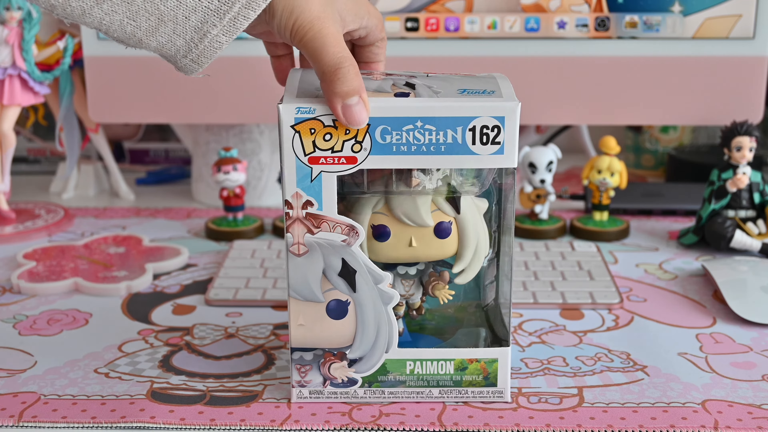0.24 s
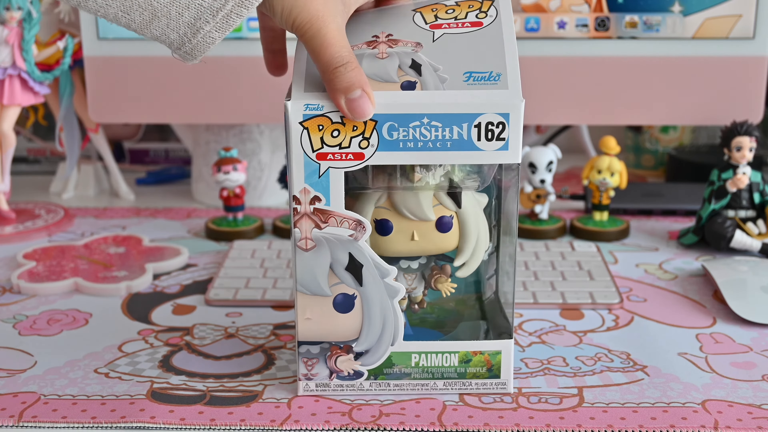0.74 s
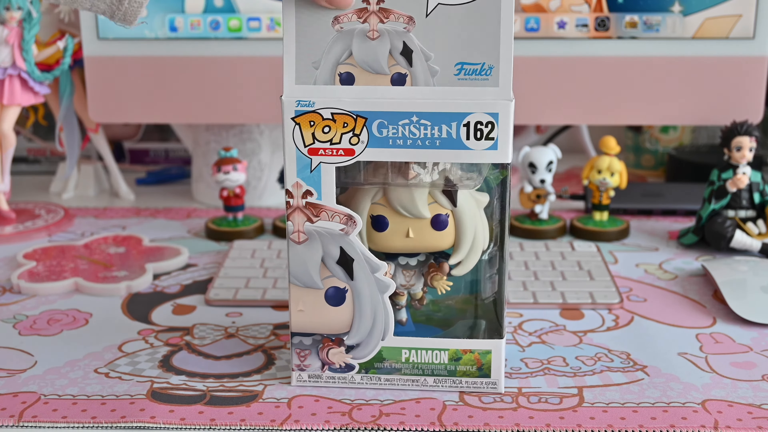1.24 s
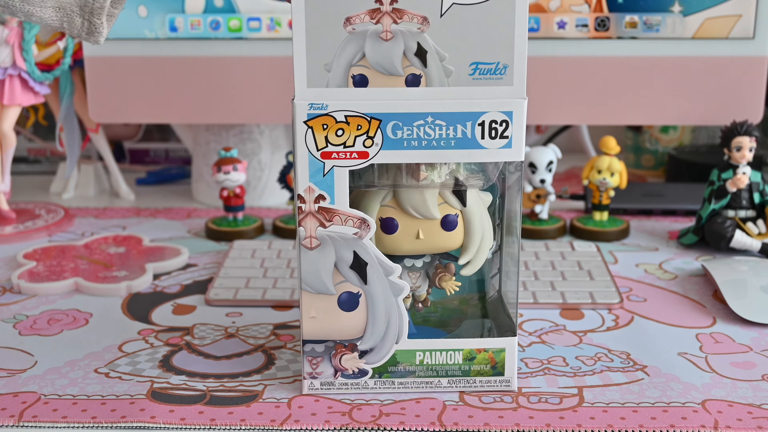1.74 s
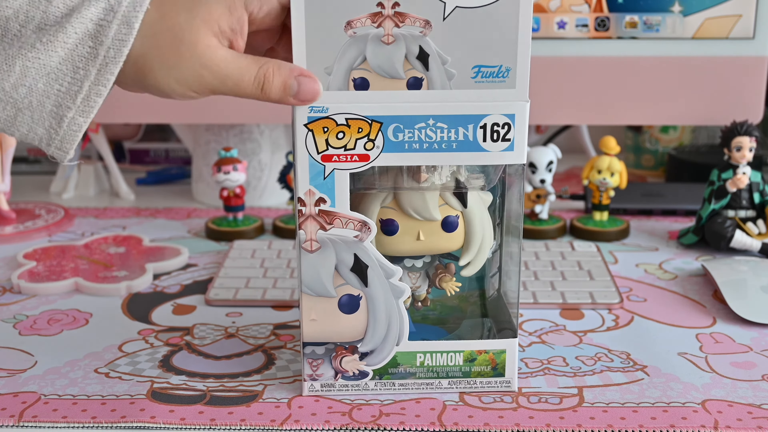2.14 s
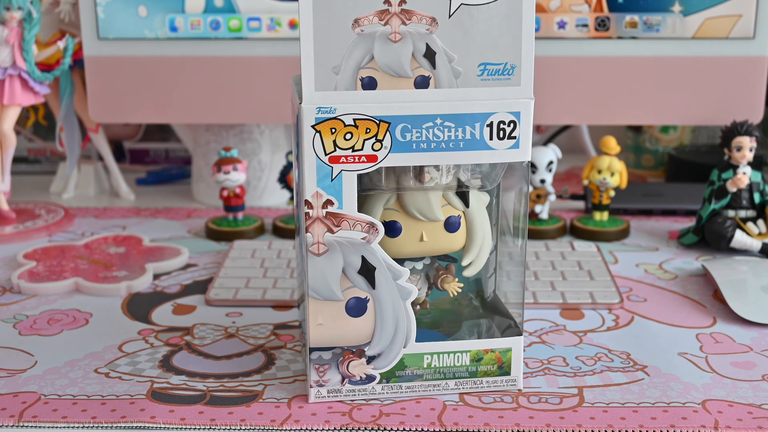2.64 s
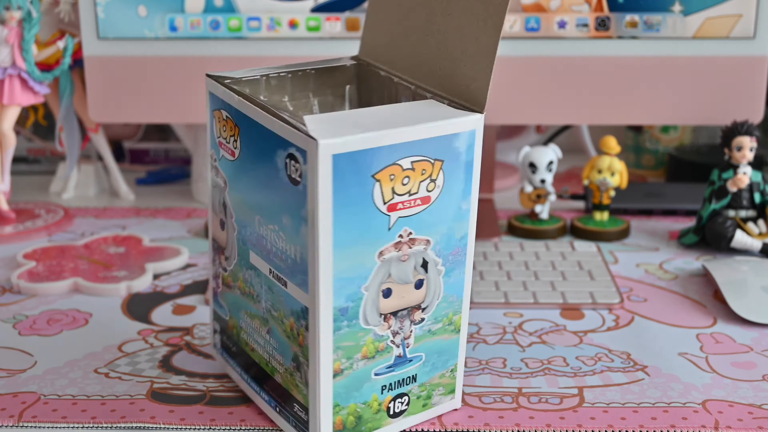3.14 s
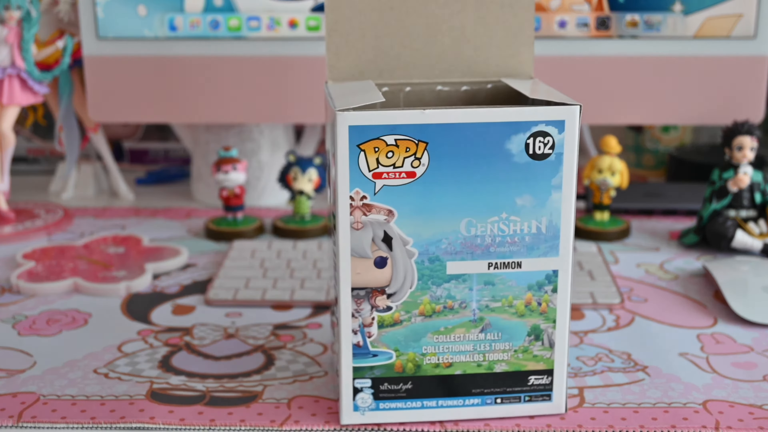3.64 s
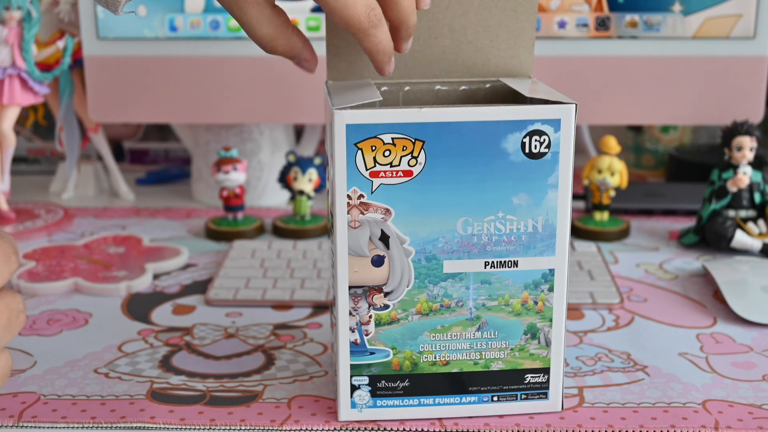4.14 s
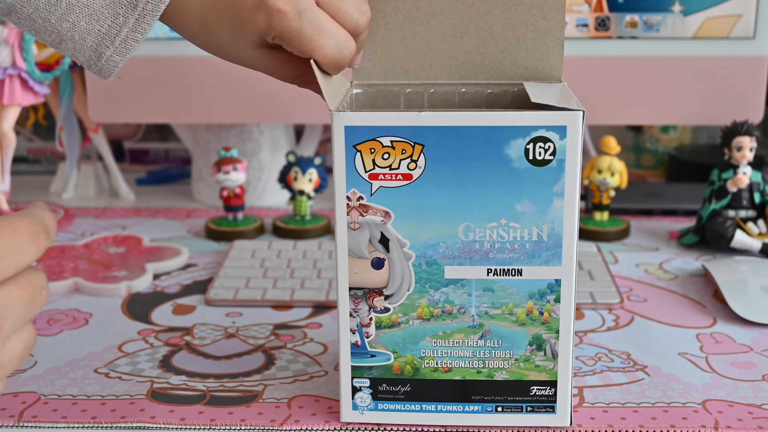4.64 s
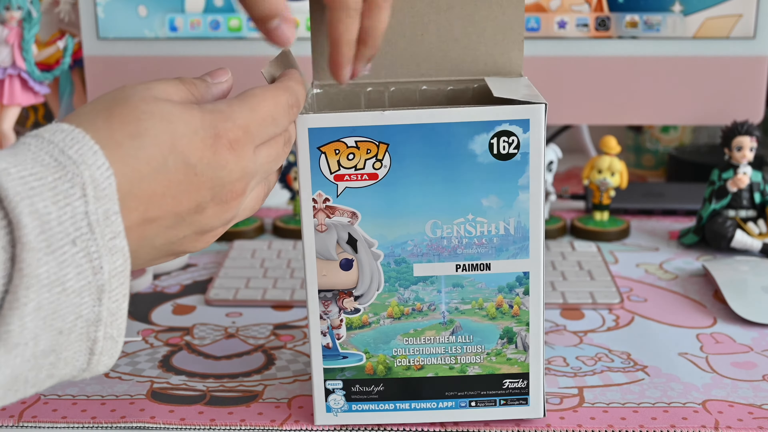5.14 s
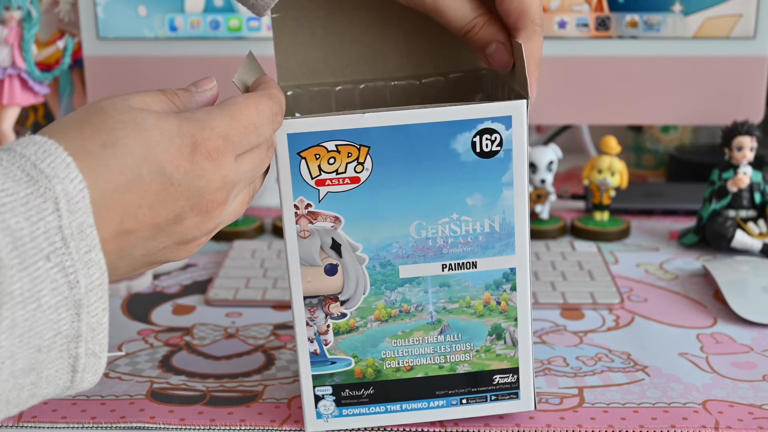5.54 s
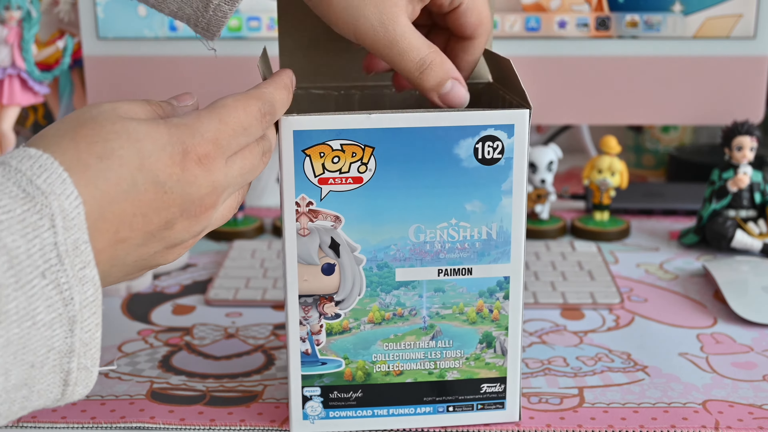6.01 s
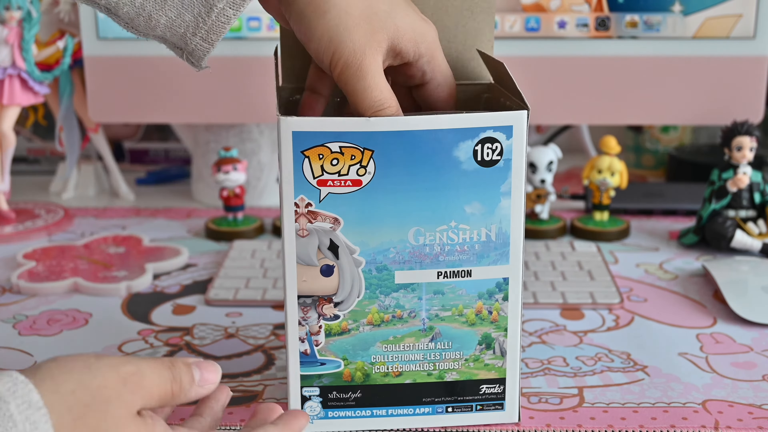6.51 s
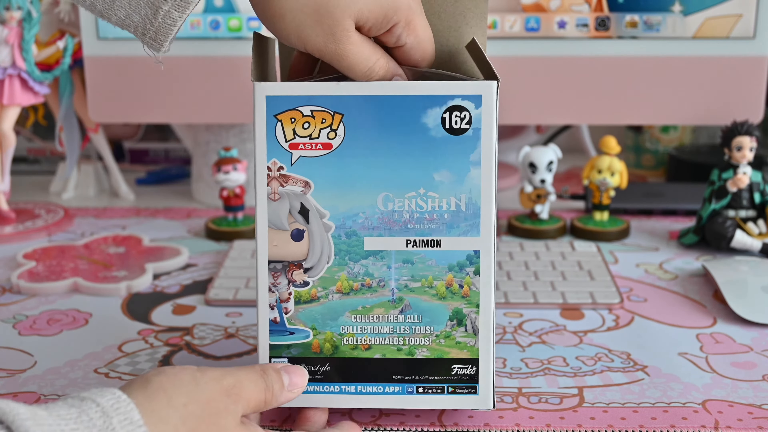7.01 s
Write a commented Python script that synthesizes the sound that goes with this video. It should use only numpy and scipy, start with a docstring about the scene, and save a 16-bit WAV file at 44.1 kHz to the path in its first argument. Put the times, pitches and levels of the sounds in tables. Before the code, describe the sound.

Close hollow taps and a lid pop, quiet card rubbing and flap clicks, then bright plastic crackling and one sharp snap in a small quiet room.

```python
"""On a desk in a small quiet room, a small cardboard box is opened close to the microphone: the lid is pulled free,
the box is turned, its side flaps are bent out, and fingers grip the thin plastic insert, which snaps loose and slides up.
Rubs, wipes, scrapes and squeaks are stick-slip friction; taps, creaks and crackles are impacts ringing damped modes.
The box resonates to all handling; the snap and the sliding insert radiate directly. The room adds diffuse reflections,
over steady air noise."""
import sys
import numpy as np
from scipy import signal
from scipy.fft import rfft, irfft, next_fast_len
from scipy.io import wavfile
from scipy.ndimage import uniform_filter1d, map_coordinates

SR = 44100
rng = np.random.default_rng(int(sys.argv[2]) if len(sys.argv) > 2 else 0)


def inscribe(sig):
    """Save sig as 16-bit PCM at rate SR to the path in sys.argv[1].

    A 1-D sig is mono; a 2-D sig holds one channel per row.
    Samples are clipped to [-1, 1] before scaling.
    """
    pcm = np.round(np.clip(np.atleast_2d(sig).T, -1, 1) * 32767)
    wavfile.write(sys.argv[1], SR, pcm.astype(np.int16))


N = 320607  # length in samples

# Levels in the tables are relative source levels; the trims in each function and the box response act on them.
# Spectra give relative density: their overall level is normalized away.


def amp(db):
    """Logarithmic level: decibels become an amplitude gain."""
    return 10 ** (np.asarray(db) / 20)


def unit(x):
    """Normalization: the signal is scaled to rms 1."""
    return x / np.sqrt(np.mean(x ** 2) + 1e-20)


def along(points, hz):
    """Interpolation on a logarithmic frequency axis, from rows of (Hz, value)."""
    f, v = np.transpose(points)
    return np.interp(np.log(hz + 1), np.log(f + 1), v)


def filtered(x, response):
    """Linear filtering: the spectrum is multiplied by a complex response of frequency."""
    m = next_fast_len(N + SR // 2)
    return irfft(rfft(x, m) * response(np.fft.rfftfreq(m, 1 / SR)), m)[:N]


def colour(x, spectrum, size=2048):
    """Minimum-phase filtering: the folded cepstrum gives a causal pulse that keeps the power of white noise."""
    cepstrum = irfft(np.log(amp(along(spectrum, np.fft.rfftfreq(size, 1 / SR)))))
    cepstrum[1:size // 2] *= 2
    cepstrum[size // 2 + 1:] = 0
    pulse = irfft(np.exp(rfft(cepstrum)))
    return signal.fftconvolve(x, pulse / np.linalg.norm(pulse))[:len(x)]


def resonance(f, hz, width):
    """Damped oscillator: causal response of one mode, 1 at its centre."""
    return 1j * f * width / (hz * hz - f * f + 1j * f * width)


def wobble(rate):
    """Slow random modulation: a smooth curve through random knots, rate of them a second."""
    knots = rng.standard_normal(int(N * rate / SR) + 4)
    return map_coordinates(knots, [np.arange(N) * rate / SR])


def add(track, s, sound):
    """Superposition: a sound is mixed into the track at time s."""
    start = max(round(s * SR), 0)
    part = track[start:start + len(sound)]
    part += sound[:len(part)]


def slips(rate, spread_db, smooth):
    """Stick-slip friction of rms 1: sparse slips of uneven size over smooth sliding noise."""
    spread = amp(spread_db * np.clip(rng.standard_normal(N), -2, 2))
    sizes = spread * rng.choice([-1, 1], N)
    sparse = sizes * (rng.random(N) < rate / SR)
    return unit(unit(sparse) + smooth * rng.standard_normal(N))


def same_energy(ring):
    """Energy normalization: a transient gets the energy of 10 ms at rms 1."""
    return ring / np.sqrt(np.sum(ring ** 2) / (SR // 100))


def burst(spectrum, t60, attack, tint_db=0):
    """Impact: decaying coloured noise stands for a dense cluster of modes, tinted by where it lands."""
    t = np.arange(SR // 5) / SR
    fade = amp(-60 * t / t60) * (1 - np.exp(-t / attack))
    hz = np.geomspace(20, SR / 2, num=60)
    tint = tint_db * rng.standard_normal(len(hz))
    tinted = np.column_stack([hz, along(spectrum, hz) + tint])
    return same_energy(colour(rng.standard_normal(len(t)) * fade, tinted))


def strokes(rows, attack, release, rest_db):
    """Incoherent addition: each stroke rises, holds and dies away, and overlapping strokes add in power."""
    t = np.arange(N) / SR
    power = np.full(N, amp(rest_db) ** 2)
    for s, length, db in rows:
        rise = np.clip((t - s) / min(attack, length / 2), 0, 1)
        fall = np.exp(-np.maximum(t - s - length, 0) / release)
        power += (amp(db) * rise * fall) ** 2
    return np.sqrt(power)


# Spectrum of the air noise. Each row: frequency in Hz, density in dB per Hz.
AIR = [(15, -78), (25, -6.5), (91, -7), (246, 2), (1530, -8), (3720, -21.5), (6550, -19.5), (15500, -26)]
AIR_DB = -58.5  # rms level


def steady_air():
    """Stationary broadband noise: white noise is shaped by one fixed spectrum."""
    return amp(AIR_DB) * unit(colour(rng.standard_normal(N), AIR))


# Pushes that strain the panels as the lid is pulled free and folded back, the box is turned, the side flaps
# are bent out, and the insert is gripped and drawn up. Each row: start in seconds, length in seconds, level in dB.
PUSHES = [(0.296, 0.12, -42), (0.439, 0.17, -38.5), (0.65, 0.086, -40.5), (0.78, 0.032, -44.5),
          (1.251, 0.61, -53.5), (1.717, 0.033, -47.5), (2.136, 0.12, -55), (2.522, 0.03, -44.5),
          (2.556, 0.021, -38.5), (2.641, 0.49, -61.5), (3.329, 0.22, -57), (4.053, 0.56, -54),
          (4.555, 0.042, -34), (5.04, 0.12, -43), (5.437, 0.14, -44), (5.754, 0.049, -41.5),
          (6.039, 0.64, -49.5), (6.676, 0.066, -40.5), (6.893, 0.35, -45.5)]
# Spectra of the panels and the skin. Each row: frequency in Hz, density in dB per Hz.
PANEL = [(25, -69), (150, -15.5), (280, -9), (450, 2.5), (1300, -2.5), (2600, -11.5), (5000, -18),
         (16000, -67)]
HISS = [(200, -38), (900, -13), (1900, 8.5), (3000, 9.5), (4200, -2), (5200, 6), (6500, -1.5), (8400, 4),
        (10200, -9.5), (13000, -4), (16000, -24)]
PUSH_ATTACK_S, PUSH_RELEASE_S = 0.0099, 0.05  # grip and letting go
PUSH_HISS_DB = -11.5  # hiss of the skin relative to the push
REST_PANEL_DB = -62.5  # force of a hand that merely rests on the box


def rubbing():
    """Stick-slip under load: coarse slips shake the panels in fits and starts while fine fibres hiss."""
    push = strokes(PUSHES, PUSH_ATTACK_S, PUSH_RELEASE_S, REST_PANEL_DB)
    pressure = wobble(rate=45)
    panel = amp(-2.0 + 2.77 * pressure) * colour(slips(rate=650, spread_db=2.5, smooth=0.89), PANEL)
    hiss = amp(PUSH_HISS_DB + 4.1 * pressure) * colour(slips(rate=680, spread_db=2.0, smooth=0.97), HISS)
    return push * (panel + hiss)


def patchy(x):
    """Changing contact: as the contact patch shifts, parts of the spectrum swell and fade on their own."""
    z = signal.stft(x, nperseg=512)[2]
    across_frequency = uniform_filter1d(rng.standard_normal(z.shape), size=12, axis=0)
    field = uniform_filter1d(across_frequency, size=5, axis=1)
    return unit(signal.istft(z * amp(2 * unit(field)), nperseg=512)[1][:N])


# Skin and sleeve brushing over the card. Each row: start in seconds, length in seconds, level in dB.
BRUSHES = [(0.312, 0.016, -40.5), (0.85, 0.23, -64), (1.56, 0.16, -59), (1.795, 0.11, -55.5),
           (2.16, 0.14, -57), (2.37, 0.07, -55.5), (3.42, 0.17, -64), (3.79, 0.23, -57), (4.04, 0.068, -56),
           (4.44, 0.15, -58), (4.88, 1.13, -58), (5.12, 0.021, -43.5)]
# Spectrum of cloth sliding over the card. Each row: frequency in Hz, density in dB per Hz.
SLEEVE = [(200, -44), (900, -1), (2000, 4), (4200, 4.5), (6500, -2.5), (8400, 2.5), (10200, -5),
          (13000, -3.5), (16000, -12)]
BRUSH_ATTACK_S, BRUSH_RELEASE_S, BRUSH_FLUTTER_DB = 0.027, 0.036, 2.5  # the hand lands, lifts and trembles
REST_HISS_DB = -68  # force of a hand that merely rests on the box


def brushing():
    """Light sliding friction: a bright, grainy hiss in uneven swells, too light to stir the panels."""
    force = strokes(BRUSHES, BRUSH_ATTACK_S, BRUSH_RELEASE_S, REST_HISS_DB)
    grain = slips(rate=600, spread_db=2, smooth=1)
    flutter = amp(2.0 + BRUSH_FLUTTER_DB * wobble(rate=35))
    return force * flutter * patchy(colour(grain, SLEEVE))


# Panels and cavity of the box. Each row: frequency in Hz, width in Hz, level in dB over the direct sound.
BOX = [(291, 26, -3), (433, 95, -12.5), (556, 103, -7.5), (644.6, 21, -8.5), (815, 14, -8), (940, 52, -8.5),
       (1097, 142, -5.5), (1241, 50, -5), (1780, 190, -14.5), (3040, 89, -20)]


def hollow(t60=0.12):
    """Modal ringing: three lower modes decay together, at strengths and pitches that shift with the grip."""
    t = np.arange(SR // 5) / SR
    ring = np.zeros(len(t))
    for hz, _, db in BOX[1:4]:
        strength = amp(db + 3 * rng.standard_normal())
        pitch = hz * rng.normal(1, .03)
        ring += strength * np.sin(2 * np.pi * (pitch * t + rng.random()))
    return same_energy(ring * amp(-60 * t / t60) * (1 - np.exp(-t / .002)))


TAP_RING_DB, TAP_RING_T60_S = -17.5, 0.043  # ring of the spot struck, relative to the tap, and its decay


def spot(hz):
    """Local panel mode: the mode under a contact beats with a weaker neighbour that roughens it."""
    t = np.arange(SR // 5) / SR
    neighbour = hz * rng.uniform(.85, 1.15)
    ring = np.sin(2 * np.pi * hz * t) + .4 * np.sin(2 * np.pi * (neighbour * t + rng.random()))
    return same_energy(ring * amp(-60 * t / TAP_RING_T60_S) * (1 - np.exp(-t / 0.00092)))


# Taps of fingers and flaps on the cardboard. Each row: start in seconds, level in dB, pitch of the spot
# struck in Hz, thump in dB relative to the tap, tick in dB relative to the tap.
TAPS = [(0.024, -34.5, 664, -11, -20), (0.081, -27.5, 670, -3, -7.5), (0.208, -24.5, 1187, -10, -8),
        (0.321, -13, 574, -3, 3.5), (0.406, -27, 676, -6, 2), (0.46, -16, 854, -14, 2),
        (0.494, -15, 650, -6, -11), (0.569, -15, 1400, -16, -4), (0.697, -17.5, 635, -17, -7),
        (0.706, -19, 1750, -19, -9), (0.725, -16.5, 1300, -23, -2.5), (0.787, -21.5, 826, -10.5, -1.5),
        (0.812, -26.5, 4430, -4, 2.5), (1.286, -30, 1280, -9, -20), (1.498, -32, 675, -23, -2),
        (1.73, -25.5, 1150, -20, -15), (2.144, -35, 558, -3, -2), (3.145, -36.5, 1123, -9, -3),
        (3.742, -31, 1280, -19, -1), (4.053, -36, 1060, -6, 10), (4.185, -27, 730, -9, -6),
        (4.307, -29.5, 490, -6.5, -1), (4.323, -35.5, 1600, -9, 7), (4.403, -26.5, 1200, -8, -4.5),
        (4.543, -25, 1185, -11, 1.5), (4.58, -17.5, 976, -8.5, 0.5), (4.605, -20, 422, -7, -9),
        (4.955, -26, 544, -2.5, -22), (5.034, -28.5, 530, -8, -11), (5.058, -32.5, 1090, -5.5, 1),
        (5.135, -25, 2360, -16, 4), (5.165, -28.5, 1040, -9, -7), (5.276, -30, 552, -6, -7),
        (5.483, -28.5, 1114, -10, -0.5), (5.529, -25.5, 810, -16, -1), (5.547, -30, 1310, -10, -10),
        (5.591, -28.5, 984, -14, -11), (5.785, -27, 1270, -25, 0), (6.044, -33, 696, -4, -1),
        (7.072, -20, 630, -13, -18)]
# Spectra of knock, thump and card tick. Each row: frequency in Hz, density in dB per Hz.
KNOCK = [(60, -52), (300, -28.5), (650, 0), (1200, 2), (1800, -3), (2600, -13), (6000, -36)]
THUMP = [(25, -54), (130, -21), (260, -9), (420, -2), (580, 4), (900, -12.5), (2500, -63)]
CARD_TICK = [(200, -37), (1300, 4), (4000, 3), (6000, -5), (8500, -4), (11000, -15), (16000, -16)]


def taps():
    """Impact excitation: a short contact tick, a knock pitched by the spot, and a slower hollow thump of the box."""
    out = np.zeros(N)
    for s, db, hz, thump_db, tick_db in TAPS:
        thump = .7 * (burst(THUMP, t60=.06, attack=.0012, tint_db=2) + hollow())
        tick = burst(CARD_TICK, t60=0.074, attack=0.00026, tint_db=4.0)
        add(out, s, amp(db - 16.0) * burst(KNOCK, t60=0.086, attack=0.00021, tint_db=3))
        add(out, s, amp(db + TAP_RING_DB) * spot(hz))
        add(out, s, amp(db + thump_db - 10) * thump)
        add(out, s, amp(db + tick_db - 17.0) * tick)
    return out


LID_POP_S, LID_POP_DB = 0.334, -17.5
# Modes of the flexing lid. Each row: frequency in Hz, level in dB, decay time t60 in seconds.
LID = [(278, -12, 0.062), (431, -2, 0.15), (545, -0.5, .08)]


def lid():
    """Modal release: the freed lid bows through with a hollow pop, and its low modes swell and boom on."""
    t = np.arange(SR // 4) / SR
    ring = sum(amp(level - 60 * t / t60) * np.sin(2 * np.pi * (hz * t + rng.random()))
               for hz, level, t60 in LID)
    out = np.zeros(N)
    add(out, LID_POP_S, amp(LID_POP_DB) * ring * (1 - np.exp(-t / 0.0036)))
    return out


# Card edges dragging past each other in quick slips. Each row: start in seconds, length in seconds, level in dB.
SCRAPES = [(0.43, 0.011, -23.5), (0.44, 0.0093, -23), (0.645, 0.043, -42), (0.69, 0.038, -36),
           (2.555, 0.031, -39.5), (4.572, 0.015, -29.5), (5.124, 0.04, -44)]
# Spectrum of the edges. Each row: frequency in Hz, density in dB per Hz.
EDGE = [(25, -42), (200, -7.5), (500, 2.5), (1700, 3.5), (2400, -1.5), (4000, -3), (6000, -15),
        (8400, -10.5), (11000, -22.5), (16000, -22)]


def scrapes():
    """Edge friction: each scrape grips quickly, chatters along the edge and lets go."""
    t = np.arange(N) / SR
    force = np.zeros(N)
    for s, length, db in SCRAPES:
        grip = np.clip((t - s) / 0.0039, 0, 1)
        release = np.exp(-np.maximum(t - s - length, 0) / 0.0052)
        force += amp(db) * grip * release
    return colour(force * slips(rate=900, spread_db=3.0, smooth=0.8), EDGE)


# Folds of the card giving in small dull knocks. Each row: start in seconds, level in dB.
CREAKS = [(1.053, -48), (1.085, -51.5), (1.161, -50.5), (2.775, -52), (2.851, -52), (2.898, -50),
          (2.992, -51), (3.095, -54), (3.383, -46.5), (3.773, -46.5), (4.099, -52), (4.869, -50.5),
          (5.303, -47), (5.334, -46.5), (5.42, -43), (6.975, -45), (6.99, -42.5), (7.015, -43),
          (7.181, -40.5), (7.214, -46)]


def creaks():
    """Sudden yielding: each time a fold gives, it knocks the panels softly, with a colour of its own."""
    out = np.zeros(N)
    for s, db in CREAKS:
        add(out, s, amp(db) * burst(KNOCK, t60=0.073, attack=0.00078, tint_db=3.5))
    return out


# Fingertips wiping along the glossy print and flap edges. Each row: start in seconds, length in seconds,
# level in dB, centre frequency in Hz, width in Hz.
WIPES = [(1.06, 0.048, -50.5, 2340, 2200), (1.39, 0.095, -51, 2230, 2490),
         (1.566, 0.042, -46.5, 3720, 3480), (1.608, 0.055, -43, 2670, 1100), (1.69, 0.041, -43, 3150, 1000),
         (1.794, 0.13, -47, 2690, 1210), (2.174, 0.14, -52.5, 4100, 3500),
         (2.552, 0.042, -34.5, 3060, 1700), (2.587, 0.14, -51.5, 3000, 1000), (3.43, 0.13, -54, 4130, 3340),
         (3.805, 0.051, -50, 2970, 2420), (4.139, 0.033, -45.5, 3100, 1200),
         (4.46, .021, -47.5, 3080, 1500), (5.197, 0.16, -46.5, 2740, 1800), (5.402, 0.081, -48, 2950, 900),
         (5.574, 0.13, -49.5, 2800, 1000), (5.935, 0.05, -51.5, 3250, 450)]
# Modes of the lid and flaps under a wiping finger. Each row: frequency in Hz, width in Hz, level in dB.
FLAP = [(2350, 290, 2.5), (3140, 250, 3)]


def wipes(flutter_db=2.5):
    """Friction-driven resonance: a grainy stick-slip rasp rings the flap, whose pitch shifts with each grip."""
    out = np.zeros(N)
    grain = slips(rate=800, spread_db=0.0, smooth=0.92)
    f = np.fft.rfftfreq(SR // 2, 1 / SR)
    for s, length, db, hz, width in WIPES:
        u = np.linspace(0, 1, round(length * SR))
        swell = np.sqrt(4 * u * (1 - u))
        grip = rng.normal(1, .025)
        flap = 1 + sum(amp(level) * resonance(f, grip * mode, damping) for mode, damping, level in FLAP)
        skin = resonance(f, hz, width) * resonance(f, hz, 2 * width)
        drive = grain[round(s * SR):][:len(u)] * swell
        rasp = irfft(rfft(drive, SR // 2) * skin * flap)
        add(out, s, amp(db - 2.5) * rasp / np.sqrt(np.sum(rasp ** 2) / len(u)))
    return out * amp(flutter_db * wobble(rate=160))


# A fingertip sticking and chirping on the card. Each row: start in seconds, level in dB, pitch in Hz.
SQUEAKS = [(1.906, -39, 1263), (2.441, -38.5, 1773), (4.319, -29, 1651)]


def squeaks(length=0.014):
    """Near-periodic stick-slip: a few cycles with jittered pitch and a weak second harmonic."""
    out = np.zeros(N)
    swell = np.hanning(round(length * SR))
    for s, db, hz in SQUEAKS:
        jitter = uniform_filter1d(rng.standard_normal(len(swell)), size=24)
        phase = 2 * np.pi * np.cumsum(hz * (1 + jitter)) / SR
        add(out, s - .001, amp(db) * swell * (np.sin(phase) + 0.11 * np.sin(2 * phase)))
    return out


# Crackles of the plastic insert. Each row: start in seconds, level in dB, tick in dB relative to the crackle.
CRACKLES = [(6.074, -30.5, -2), (6.092, -22.5, -4), (6.106, -31, -2), (6.142, -22.5, -6),
            (6.174, -25, -1.5), (6.24, -24.5, -28), (6.257, -23.5, -8.5), (6.296, -21.5, -11),
            (6.315, -33, 2.5), (6.32, -23.5, -12), (6.357, -28, -1), (6.387, -30, -8), (6.407, -29, -10),
            (6.456, -39, -3), (6.503, -23.5, -4), (6.546, -23.5, -15), (6.64, -26, -6.5),
            (6.663, -20.5, -8), (6.676, -24.5, -2.5), (6.691, -21.5, -8), (6.898, -29, 5), (6.917, -27, 0),
            (7.229, -30.5, -4.5)]
# Spectrum of the plastic tick. Each row: frequency in Hz, density in dB per Hz.
PLASTIC_TICK = [(200, -55), (1200, -5), (2600, 9), (4500, 1), (6000, -4.5), (8000, 1.5), (10500, -14.5),
                (16000, -16)]
# lesser crackles under the grip: span in seconds, level, scatter either way
CRINKLE_S, CRINKLE_DB, CRINKLE_SPREAD_DB = (6.1, 7.05), -34, 2.5


def crackles(count=26):
    """Buckling: thin plastic gives in bright clicks that jolt the card, with lesser ones in between."""
    out = np.zeros(N)
    start, end = CRINKLE_S
    lesser = []
    for k, (late, size) in enumerate(rng.random((count, 2))):
        s = start + (end - start) * (k + late) / count
        lesser.append((s, CRINKLE_DB + CRINKLE_SPREAD_DB * (2 * size - 1), -8))
    for s, db, tick_db in CRACKLES + lesser:
        tick = burst(PLASTIC_TICK, t60=0.019, attack=0.00037, tint_db=3.0)
        add(out, s, amp(db - 16) * burst(KNOCK, t60=0.052, attack=0.00036, tint_db=3.5))
        add(out, s, amp(db - 20) * spot(rng.uniform(450, 1300)))  # each jolt finds another spot of the card
        add(out, s, amp(db - 21.0) * burst(THUMP, t60=0.069, attack=0.0015, tint_db=3.5))
        add(out, s, amp(db + tick_db - 14.0) * tick)
    return out


SNAP_S, SNAP_DB = 6.744, -14.5
SNAP_RING_DB, SNAP_CLATTER_DB = -5.5, -19  # gains of the ringing walls and of the loose contact
REBOUND_S, REBOUND_DB = .007, -9  # the wall strikes the card once more: delay, level relative to the snap
# Modes of the insert. Each row: frequency in Hz, level in dB, decay time t60 in seconds.
INSERT = [(453, -2.5, .07), (580, -6, 0.06), (951, 1.5, 0.087), (1309, 8, 0.035), (1495, 9, 0.045),
          (1734, 4, 0.044), (1910, 7.5, 0.035), (3300, 8.5, 0.022), (3670, -2, .025), (4110, 10, 0.014),
          (5030, 5.5, 0.016)]
# Spectrum of the sliding plastic wall. Each row: frequency in Hz, density in dB per Hz.
SLIDE = [(100, -37), (500, -10), (950, 0), (1350, 4), (2200, -4), (5000, -13), (16000, -56)]


def snap():
    """Elastic release: the insert springs past the rim with a push of air, a crack, ringing walls and a rebound."""
    t = np.arange(SR // 5) / SR
    u = (t - .0004) / .000145  # time from the middle of the air pulse, in pulse widths
    push = 4 * (u - .13) * np.exp((1 - u * u) / 2)
    ring = sum(amp(level - 60 * t / t60) * np.sin(2 * np.pi * (hz * t + rng.random()))
               for hz, level, t60 in INSERT)
    ring *= 1 - np.exp(-t / .001)
    crack = burst(PLASTIC_TICK, t60=.022, attack=.0003)
    clatter = burst(KNOCK, t60=.04, attack=.0008)
    release = push + amp(SNAP_RING_DB) * ring + amp(SNAP_CLATTER_DB) * clatter + amp(-9.5) * crack
    out = np.zeros(N)
    # the wall buckles first, then the insert slips
    add(out, SNAP_S - .0139, amp(SNAP_DB - 26.0) * burst(HISS, t60=0.03, attack=0.00043))
    add(out, SNAP_S - .0018, amp(SNAP_DB - 16) * burst(EDGE, t60=.012, attack=.001))
    add(out, SNAP_S, amp(SNAP_DB) * release)
    add(out, SNAP_S + REBOUND_S, amp(SNAP_DB + REBOUND_DB) * burst(SLIDE, t60=0.07, attack=.0003))
    return out


SLIDE_S, SLIDE_DB, SLIDE_FADE_DB_PER_S = 6.765, -37, 55  # the freed insert slides up, slowing
SLIDE_RING_DB = -7  # added to the level of each mode of the insert


def slide():
    """Friction-driven modes: the freed plastic rattles along the card and dies away as it slows."""
    since = np.arange(N) / SR - SLIDE_S
    fade = amp(SLIDE_DB - SLIDE_FADE_DB_PER_S * np.maximum(since, 0))
    force = np.clip(since / 0.0085, 0, 1) * fade
    grain = colour(slips(rate=900, spread_db=1, smooth=0.65), SLIDE)
    rattle = force * amp(1.7 * wobble(rate=150)) * grain

    def wall(f):
        """Modal sum: each decay time sets the width of its resonance, beside the direct sound."""
        return 1 + sum(amp(SLIDE_RING_DB + db) * resonance(f, hz, np.log(1000) / np.pi / t60)
                       for hz, db, t60 in INSERT)

    return filtered(rattle, wall)


def box(x):
    """Modal superposition: the resonances of the box stand out from the directly radiated sound."""
    return filtered(x, lambda f: 1 + sum(amp(db) * resonance(f, hz, width) for hz, width, db in BOX))


# Reverberation of the room. Each row: frequency in Hz, decay time t60 in seconds.
ROOM = [(100, 0.19), (500, 0.37), (3000, 0.53), (12000, 0.3)]
SNAP_ROOM_DB, ROOM_DB = -15, -11  # sends to the room: the snap with the slide, and the handling


def room(x):
    """Diffuse reverberation: noise decays at its own speed in each frequency band, with little bass."""
    hz, t, z = signal.stft(rng.standard_normal(SR // 2), SR, nperseg=256)
    tail = signal.istft(z * amp(-60 * t / along(ROOM, hz)[:, None]), SR, nperseg=256)[1]
    tail = np.pad(tail / np.linalg.norm(tail), (SR // 200, 0))  # 5 ms before the first reflection
    return filtered(signal.fftconvolve(x, tail)[:N], lambda f: (1j * f / (1j * f + 150)) ** 2)


def scene():
    """Superposition: the handled box, the released insert, their reflections and steady air noise."""
    friction = rubbing() + brushing() + wipes() + squeaks() + scrapes()
    impacts = taps() + lid() + creaks() + crackles()
    handling = box(friction + impacts)
    release = snap() + slide()
    reflections = room(amp(ROOM_DB) * handling + amp(SNAP_ROOM_DB) * release)
    return (handling + release + reflections + steady_air())[None]


TOP_HZ = 16000  # band limit


def record(dry):
    """Clipping and band limiting: full scale limits the peak, then nothing is kept above the band limit."""
    return filtered(np.clip(dry[0], -1, 1), lambda hz: hz < TOP_HZ)[None]


dry = scene()
out = record(dry)
inscribe(out)
```